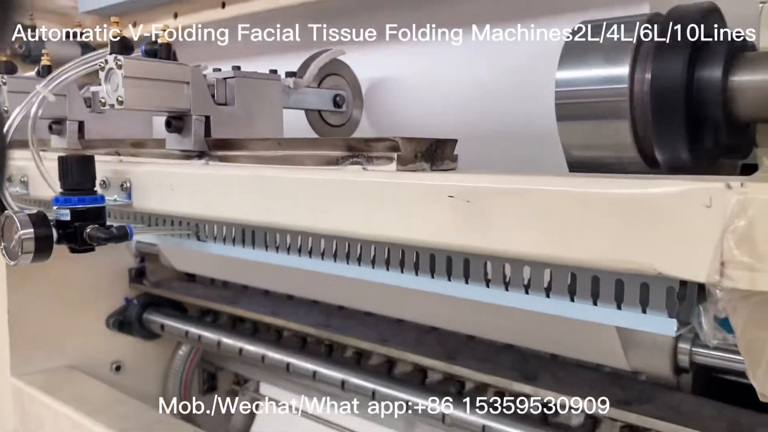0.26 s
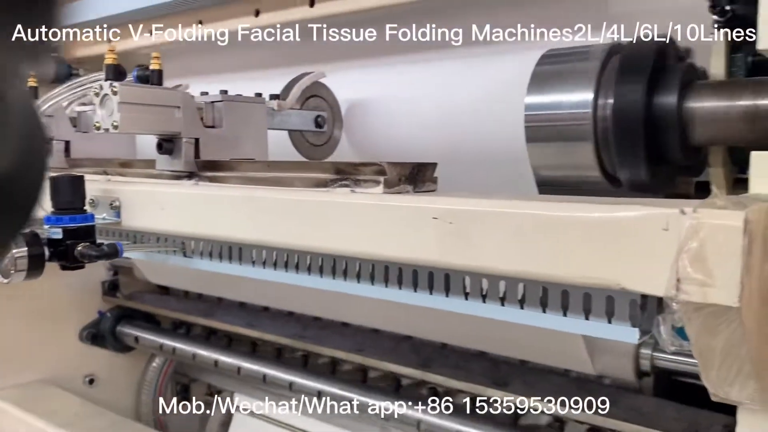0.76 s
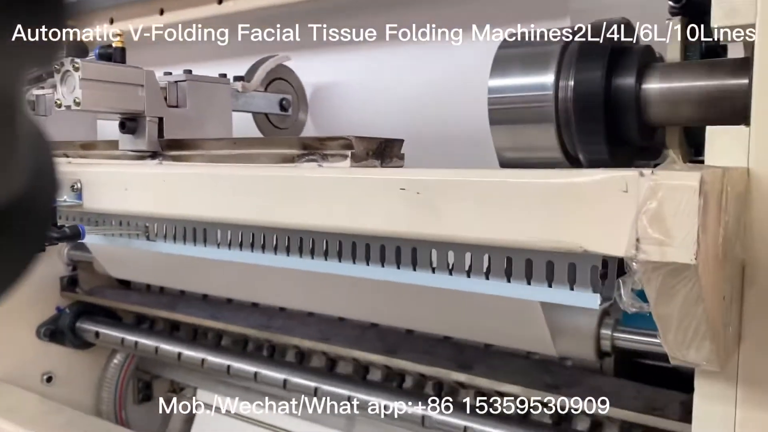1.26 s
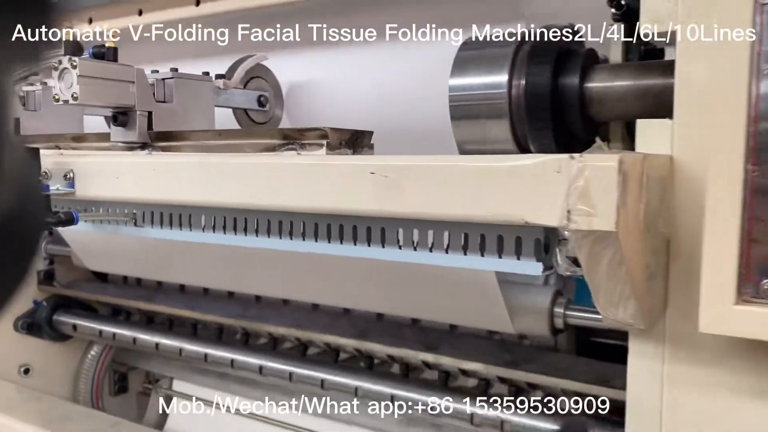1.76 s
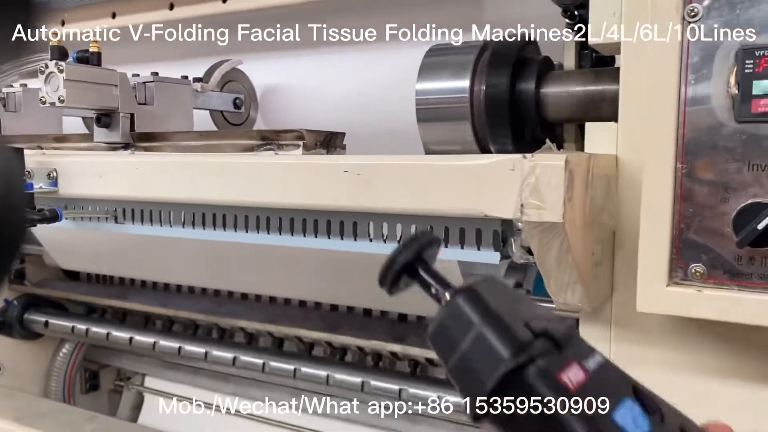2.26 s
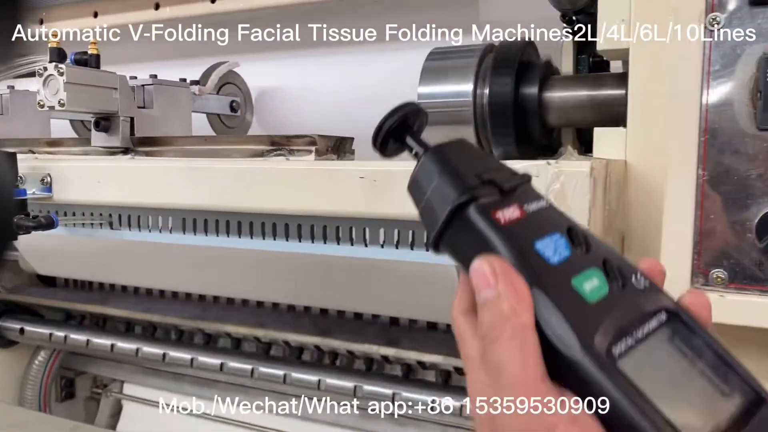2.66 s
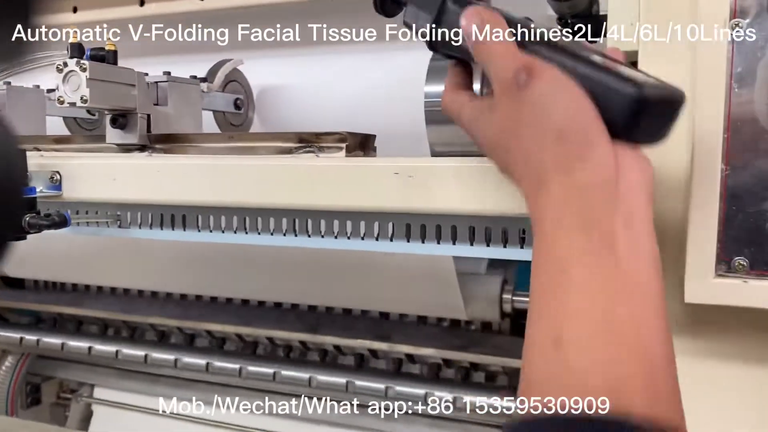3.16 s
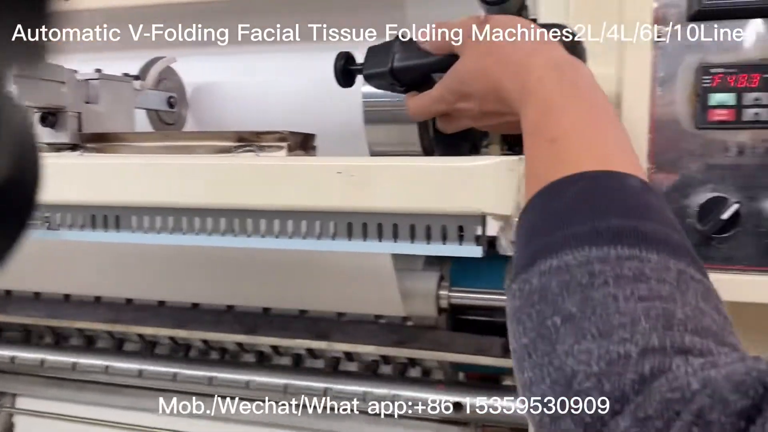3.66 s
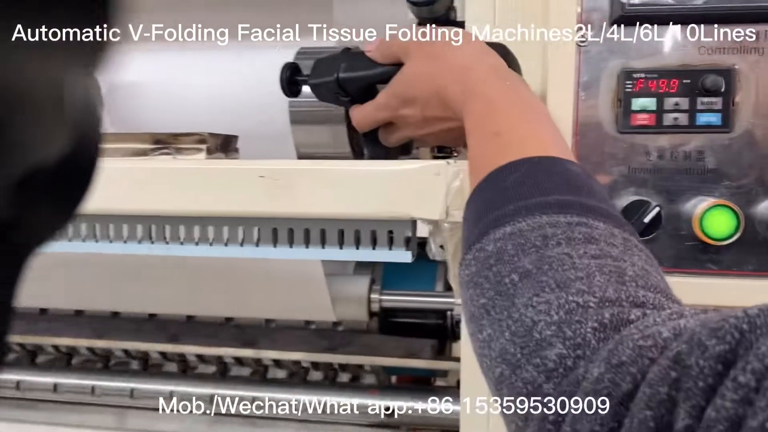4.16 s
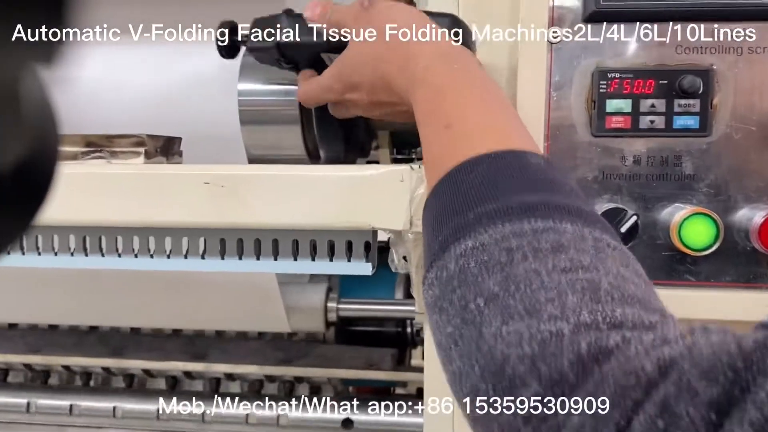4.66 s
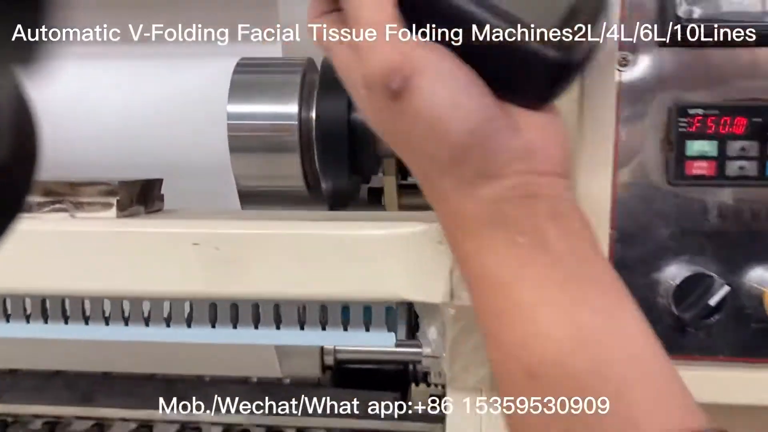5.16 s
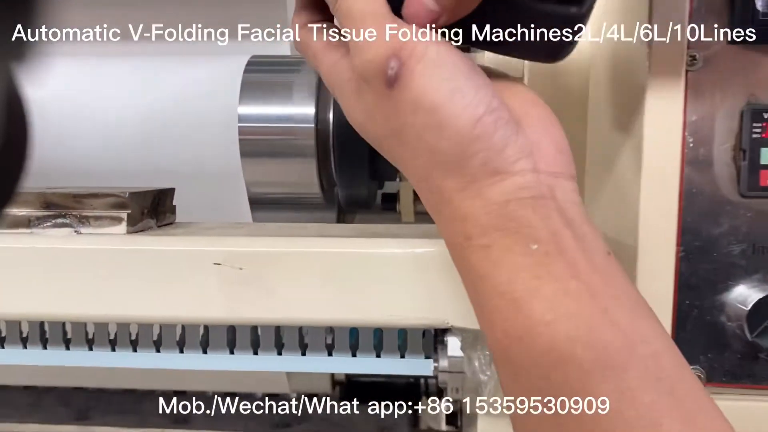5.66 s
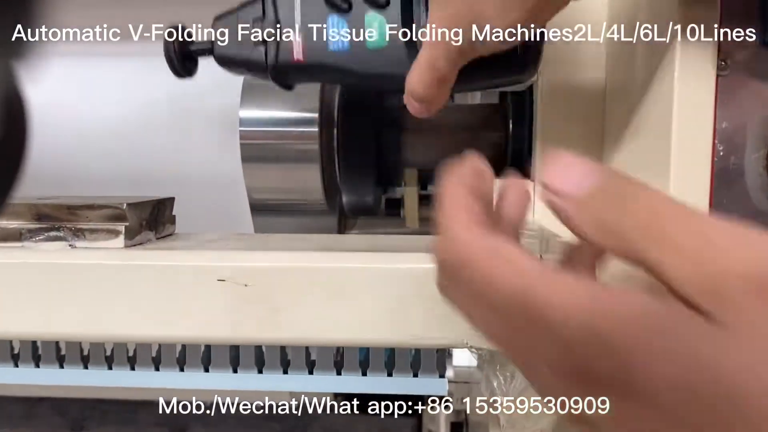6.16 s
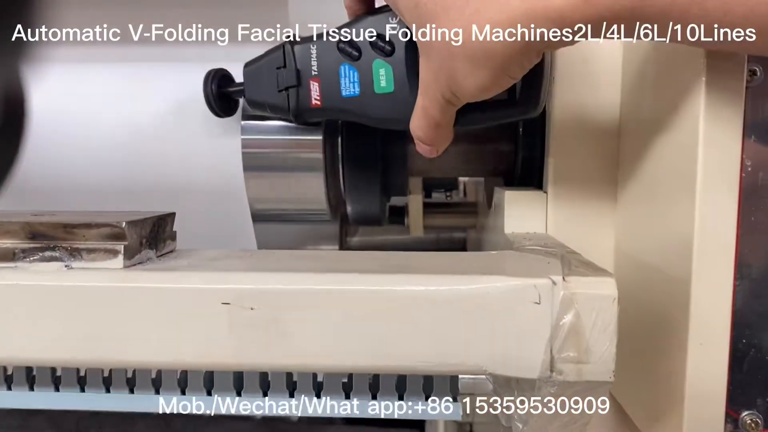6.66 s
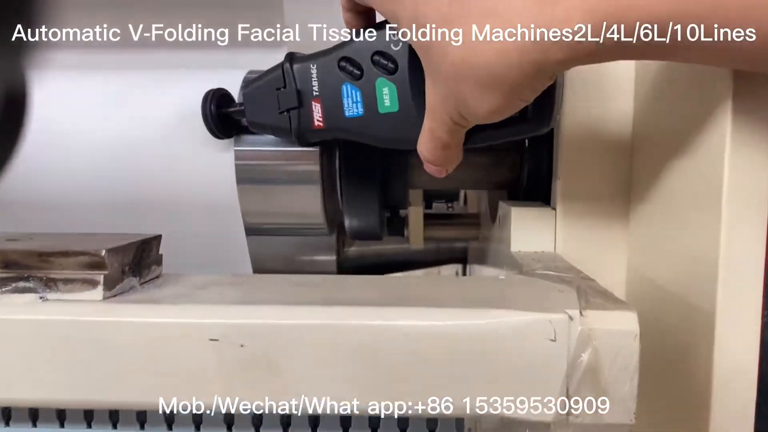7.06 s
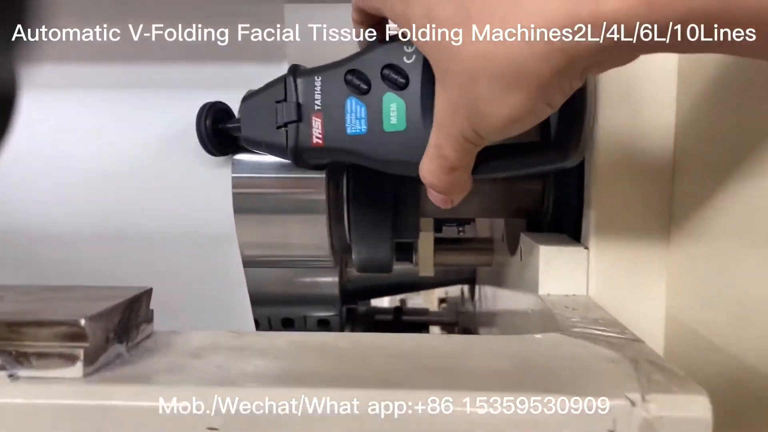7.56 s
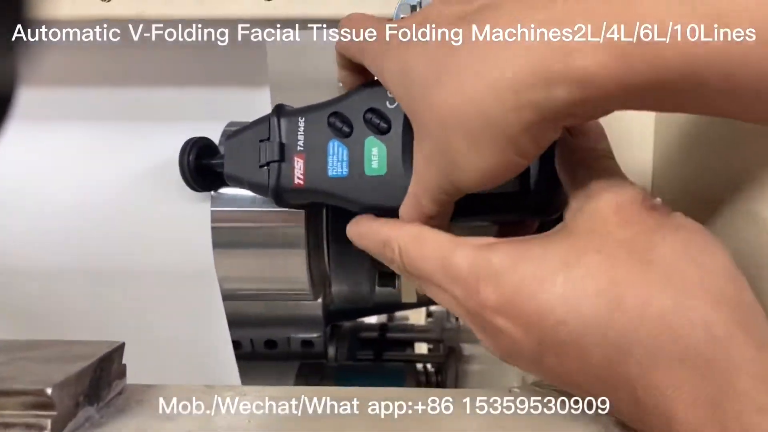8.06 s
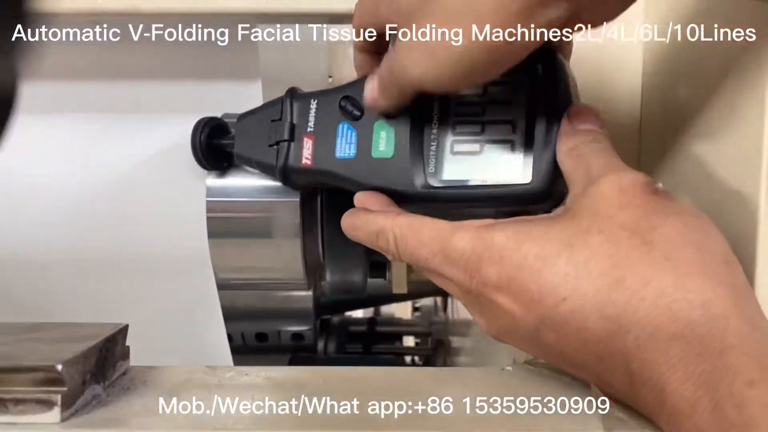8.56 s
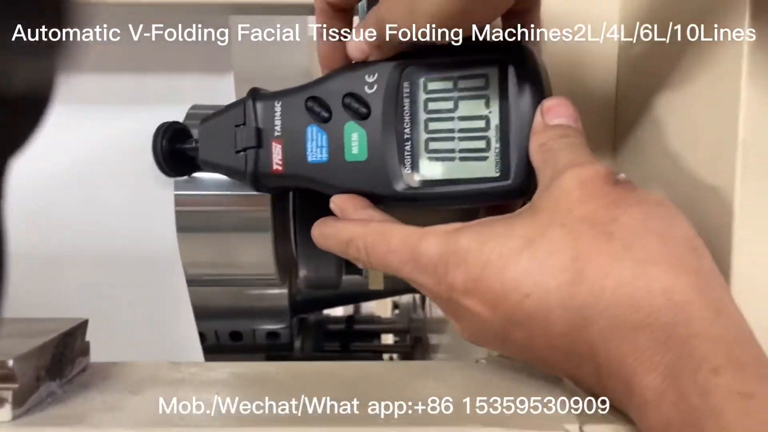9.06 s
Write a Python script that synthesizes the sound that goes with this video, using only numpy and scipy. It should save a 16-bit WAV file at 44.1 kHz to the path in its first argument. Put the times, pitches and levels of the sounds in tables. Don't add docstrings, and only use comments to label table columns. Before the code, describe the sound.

Close beside a running paper folding machine in a factory hall, knives shear in a fast metallic clatter, every third crack strongest. The pace climbs in steps during the first four seconds, then holds. Dull shaft knocks grow nearer, rolls and gears drum and hum, the motor whines, a bearing squeals briefly early on, and suction air hisses. Near stereo microphones, short hall reverberation.

```python
import sys
import numpy as np
from scipy import signal
from scipy.fft import rfft, irfft
from scipy.io import wavfile
from scipy.ndimage import uniform_filter1d

SR = 44100
rng = np.random.default_rng(int(sys.argv[2]) if len(sys.argv) > 2 else 0)


def to_wav(s):
    ch = np.atleast_2d(s).T
    pcm = np.round(np.clip(ch, -1, 1) * 32767)
    wavfile.write(sys.argv[1], SR, pcm.astype(np.int16))


def gain_from_db(level_db):
    decades = np.asarray(level_db, float) / 20
    return 10 ** decades


N = 411012
TIME = np.arange(N) / SR
HZ = np.fft.rfftfreq(N, 1 / SR)

# (time [s], cut rate [cuts/s])
SPEED = [(0, 5.9591), (.4947, 6.1425), (1.0062, 6.9311), (1.379, 7.2203), (2.2717, 7.2208),
         (3.1993, 8.4331), (3.934, 8.642), (3.974, 8.906), (9.32, 8.906)]
# (time [s], level [dB])
SHAFT_NEAR = [(0, -16), (2.5, -9.5), (4.2, -3.5), (5.4, -6), (5.9, 0.3), (8.3, 1.4), (9.32, -2.5)]


def in_time(rows):
    seconds, *columns = np.transpose(rows)
    return [np.interp(TIME, seconds, column) for column in columns]


def cut_count():
    first_cut = -.1492
    return first_cut + np.cumsum(in_time(SPEED)[0]) / SR


def follow(base_db, share, control_db):
    return gain_from_db(base_db + share * control_db)


def gate(start, length, edge_s=.08):
    inside = np.minimum(TIME - start, start + length - TIME)
    return np.clip(inside / edge_s + .5, 0, 1)


def drift(rate):
    knots = rng.standard_normal(int(N / SR * rate) + 2)
    return uniform_filter1d(np.interp(TIME * rate, np.arange(len(knots)), knots), size=400)


def slope(points):
    hz, db = np.transpose(points)
    return gain_from_db(np.interp(np.log(HZ + 1), np.log(hz), db))


def bell(hz, centre_hz, width_hz):
    return 1 / (1 + 2j * (hz - centre_hz) / width_hz)


def lift(peaks, hz):
    return gain_from_db(sum(db * np.abs(bell(hz, centre_hz, width_hz)) ** 2 for centre_hz, width_hz, db in peaks))


def modes(peaks):
    gain = 0
    for k, (centre_hz, width_hz, db) in enumerate(peaks):
        gain = gain + gain_from_db(db) * bell(HZ, centre_hz, width_hz) * (-1) ** k
    return gain / np.sqrt(np.mean(np.abs(gain) ** 2))


def colour(x, gain):
    return irfft(rfft(x) * gain, N)


def noise(gain):
    return colour(rng.standard_normal((2, N)), gain / np.sqrt(np.mean(gain ** 2)))


def tone(cycles, db):
    quarter_apart = np.c_[[0, 1 / 4]]
    return gain_from_db(db) * np.sqrt(2) * np.sin(2 * np.pi * (cycles + rng.random() + quarter_apart))


def knives(cuts, near_db, grains_per_s=7000, size_db=3.0, uneven_db=.9):
    # (place [cuts], rise [cuts], fall [cuts],
    # crack [dB], low ring [dB], high ring [dB])
    contacts = [(.93, 0.013, 0.029, -22, -60, -23.5), (0.992, 0.025, 0.022, -18.5, -21.5, -20.5),
                (1.027, 0.013, 0.022, -21.5, -21, -40), (1.41, .005, 0.074, -29.5, -44, -31),
                (1.543, 0.019, .03, -32, -36, -36), (1.92, 0.018, 0.045, -30.5, -43, -28.5),
                (1.978, 0.036, 0.025, -21.5, -22, -35.5), (2.025, 0.021, 0.027, -25, -31, -25.5),
                (2.41, .005, 0.066, -31, -34, -33.5), (2.54, 0.0094, 0.052, -33.5, -41, -30),
                (2.915, 0.032, 0.031, -37, -38.5, -28.5), (2.962, 0.012, 0.03, -24, -22.5, -38),
                (3.019, 0.03, 0.026, -22, -30, -28), (3.404, 0.0092, 0.11, -31.5, -40.5, -31.5),
                (3.54, 0.026, 0.027, -41, -37, -37.5)]
    # (frequency [Hz], density [dB per Hz])
    crack_colour = [(900, -53), (1800, 4), (2600, 0), (4000, -6), (5600, -1), (6500, 1.5), (8000, -2),
                    (9500, -4), (12000, -7.5), (15500, -5), (16500, -5)]
    # (frequency [Hz], width [Hz], level [dB])
    knife_ring = [(3466, 560, -1.5), (3585, 160, 6), (3935, 47, -5)]
    # (frequency [Hz], width [Hz], level [dB])
    anvil_ring = [(4180, 236, -3), (4710, 190, 0.5), (5110, 450, -7.5), (7310, 220, -2.5)]

    sizes = gain_from_db(size_db * np.minimum(rng.exponential(1, (2, N)), 5)) * rng.choice([-1, 1], (2, N))
    grains = sizes * (rng.random((2, N)) < grains_per_s / SR)
    grains *= follow(0.58, 1.83, near_db) / np.sqrt(np.mean(grains ** 2))

    press = np.zeros((3, N))
    for place, rise, fall, *level_db in contacts:
        turn, since = np.divmod(cuts - place + 1.5, 3)
        since -= 1.5
        shape = np.exp(np.where(since < 0, since / rise, -since / fall))
        passes = gain_from_db(np.c_[level_db] + uneven_db * rng.standard_normal((3, 30)))
        press += shape * passes[:, turn.astype(int) + 2]

    crack = slope(crack_colour)
    bodies = [crack / np.sqrt(np.mean(crack ** 2)), modes(knife_ring), modes(anvil_ring)]
    return sum(colour(grains * p, body) for p, body in zip(press, bodies))


def knocks(cuts, uneven_db=1.3):
    # (frequency [Hz], level [dB], T60 [s], lag [s])
    cover_modes = [(227, -12.5, 0.083, .03), (293, -23.5, 0.049, .022), (376, -18.5, 0.09, .018),
                   (438, -11, 0.076, 0.00313), (540, -22, 0.043, 0.0059), (666, -20, 0.099, 0.00212),
                   (708, -23, 0.053, 0.00503), (812.7, -17, 0.11, 0.00289), (872, -23, 0.032, 0.00084),
                   (966, -19.5, 0.041, 0.00595), (1095, -23, 0.052, 0.00293), (1225, -23.5, 0.066, 0.0077)]
    first, every = .7, 1.8912
    rebound, rebound_db, rebound_hz = .53, -3.5, 800
    contact_hz = 100

    turns = np.arange(int((cuts[-1] - first) / every) + 1)
    out = np.zeros((2, N))
    for hz, db, t60, lag in cover_modes:
        hits = np.full((2, N + SR), 1e-18)
        dulled_db = rebound_db - 10 * np.log10(1 + (hz / rebound_hz) ** 4)
        for share, loss_db in ((0, 0), (rebound, dulled_db)):
            at = np.searchsorted(cuts, first + every * (turns + share)) + int(lag * SR)
            strength_db = db + loss_db + uneven_db * rng.standard_normal((2, len(turns)))
            hits[:, at] = gain_from_db(strength_db) * rng.choice([-1, 1])
        r = gain_from_db(-60 / (t60 * SR))
        w = 2 * np.pi * hz / SR
        ringing = signal.lfilter([0, np.sin(w)], [1, -2 * r * np.cos(w), r * r], hits[:, :N])
        out += signal.lfilter(*signal.iirpeak(hz, hz / contact_hz, fs=SR), ringing)
    return out * gain_from_db(in_time(SHAFT_NEAR)[0])


def rolls(cuts):
    # (multiple of the cut rate, level [dB])
    gears = [(22, -36), (26.42, -36.5), (25.92, -39), (38.58, -39), (38.08, -45), (39.08, -46), (74.8, -42),
             (149.6, -55.5)]
    # (multiple of the cut rate, level [dB])
    drive_gears = [(18, -42.5), (19, -38), (20, -31.5)]
    # (time [s], level [dB])
    drive_load = [(0, -17), (.4, 4.5), (.9, -4), (1.2, 6.5), (1.8, 7.5), (2.1, -8), (2.4, 7.5), (3, -7),
                  (3.6, -6), (5, 2.5), (9.32, 1)]
    # (frequency [Hz], width [Hz], lift [dB])
    panels = [(128, 25, 4), (235, 22, 8), (285, 20, 6), (345, 20, 10), (542, 30, 12), (1080, 50, 13)]

    per_s, = in_time(SPEED)
    out = np.zeros((2, N))
    for times, db in gears:
        mesh = tone(times * cuts + 0.087 * drift(7), db + 2.2 * drift(9))
        out += mesh * lift(panels, times * per_s)
    load = gain_from_db(in_time(drive_load)[0])
    for times, db in drive_gears:
        mesh = tone(times * cuts, db + 2.2 * drift(3.5))
        out += load * mesh * lift(panels, times * per_s)
    for times in range(9, 34):
        out += tone(times * cuts, -43 + 2.0 * rng.standard_normal())
    return out


def whines(near_db, facing_db):
    # (multiple, level [dB], share of the facing)
    drive_tones = [(1, -49.5, .1), (4, -56, .2), (6, -47, .4)]
    # (start [s], length [s], frequency [Hz], glide [Hz/s], level [dB])
    squeals = [
        (.03, .24, 2392, 0, -41),
        (.33, .32, 2388, -40, -41.5),
        (1.8, .42, 2336, 0, -44.5),
        (2.3, .14, 2336, 0, -48),
    ]
    # (frequency [Hz], level [dB])
    steady_tones = [(1382, -44), (5125, -58)]

    out = np.zeros((2, N))
    cycles = 2563.6 * TIME + 0.1 * drift(8.4)
    open_db = 8 * gate(1.03, 1.52)
    for times, db, share in drive_tones:
        clear_db = open_db * (times == 1)
        out += tone(times * cycles, db + share * facing_db + clear_db + 1.6 * drift(15))
    for start, length, hz, glide, db in squeals:
        t = TIME - start
        squeal_cycles = hz * t + glide * t ** 2 / 2 + .2 * drift(12)
        out += gate(start, length) * tone(squeal_cycles, db + 1.5 * drift(14))
    for hz, db in steady_tones:
        out += tone(hz * TIME + 0.08 * drift(6), db + 0.99 * near_db + 2.0 * drift(3))
    return out


def running(near_db, facing_db):
    # (frequency [Hz], density [dB per Hz])
    rumble = [(40, -6), (50, -3.5), (72, -12), (86, -3), (105, -0.5), (124, 0), (200, -5), (315, -3),
              (442, -5.5), (540, -7), (1160, -17), (1620, -17), (2090, -25), (3200, -27)]
    # (frequency [Hz], width [Hz], lift [dB])
    frame_modes = [(67.6, 12, 11.5), (101, 49, 4.5), (128.4, 20, 3.5), (177, 20, 2.5), (218, 14.5, 7),
                   (288.5, 7.4, 5), (356, 12, 4), (449, 4.3, 0), (558, 11, 4), (755, 8.1, 3.5),
                   (1420, 60, 1), (1662, 12, 8.5)]
    # (frequency [Hz], density [dB per Hz])
    air_colour = [(2400, 7), (3000, 1), (4000, -2.5), (5500, -3), (7000, -5.5), (8300, -8), (9500, -7.5),
                  (12000, -8.5), (13500, -19), (15000, -6), (15700, -1.5), (16500, -19)]
    # (frequency [Hz], width [Hz], level [dB])
    leak_tone = [(5200, 1600, -0.5), (10900, 1700, -8.5), (15800, 660, 6.5)]

    frame = slope(rumble) * lift(frame_modes, HZ)
    below_deep = 1 / (1 + (HZ / 180) ** 8)
    below_drum = 1 / (1 + (HZ / 900) ** 8)
    below_rustle = 1 / (1 + (HZ / 3000) ** 8)
    above_rustle = 1 / (1 + (2600 / (HZ + 1)) ** 8)
    deep_gain = frame * np.sqrt(below_deep)
    drum_gain = frame * np.sqrt((1 - below_deep) * below_drum)
    rustle_gain = frame * np.sqrt((1 - below_drum) * below_rustle)
    air_gain = slope(air_colour) * np.sqrt(above_rustle)

    deep = follow(-24.5, 1.1, near_db) * gain_from_db(0.2 * drift(12)) * noise(deep_gain)
    drum = follow(-17.5, 0.88, near_db) * gain_from_db(1.8 * drift(14)) * noise(drum_gain)
    rustle = follow(-26.5, 2, near_db) * gain_from_db(1.26 * drift(20)) * noise(rustle_gain)
    air = follow(-37, .1, near_db) * gain_from_db(2.0 * drift(25)) * noise(air_gain)
    leak = follow(-31, 1, facing_db) * gain_from_db(0.46 * drift(10.8)) * noise(np.abs(modes(leak_tone)))
    return deep + drum + rustle + air + leak


def thin_hiss():
    hiss_gain = np.abs(modes([(9400, 1600, 0)])) ** 2
    return follow(-56, 1.1, in_time(SHAFT_NEAR)[0]) * gain_from_db(2.6 * drift(35)) * noise(hiss_gain)[0]


def hall(x, t60_s=.35, level_db=-13):
    t = TIME[:SR // 2]
    tail = rng.standard_normal((2, len(t))) * gain_from_db(-60 * t / t60_s) * (t > .002)
    tail /= np.sqrt(np.sum(tail ** 2) / 2)
    return gain_from_db(level_db) * signal.fftconvolve(x, tail, axes=1)[:, :N]


def ports(pair):
    # (frequency [Hz], likeness [0-1], right leads [rad], left minus right [dB])
    port_pair = [(0, .995, 0, 1), (130, .95, 0, 1.4), (300, .75, .05, 1.1), (700, .15, .3, .4),
                 (1150, .2, -1.2, .3), (1700, .78, -.2, -1), (2700, .6, 1, -1.6), (3800, .68, .6, -3),
                 (5700, .12, 1.2, -3), (6500, .65, .5, -.5), (8000, .45, -1.7, 1.5), (8800, .9, -2.8, 1.5),
                 (9600, .85, -3.95, .2), (17000, .9, -14.4, 0)]
    port_hz, *columns = np.transpose(port_pair)
    alike, lead, balance_db = (np.interp(HZ, port_hz, column) for column in columns)
    shared, own = rfft(pair)
    right = (alike * shared + np.sqrt(1 - alike ** 2) * own) * np.exp(1j * lead)
    return irfft(np.array([shared * gain_from_db(balance_db / 2), right * gain_from_db(-balance_db / 2)]), N)


def scene():
    # (time [s], level [dB])
    closeness = [(0, -2), (1, -2), (2.5, -2), (3.3, -1), (4.3, -0.24), (5.5, 0.4), (6.4, 0.35), (7.8, -0.1),
                 (9.32, -0.2)]
    # (time [s], level [dB])
    facing = [(0, -6.5), (.8, -5), (1.5, -2), (2.2, -0.3), (2.7, 0), (3.3, -13), (4.2, -16), (5.8, -27),
              (6.6, -6), (7.3, -11), (9.32, -19)]
    cuts = cut_count()
    near_db, = in_time(closeness)
    facing_db, = in_time(facing)
    blows = knives(cuts, near_db) + knocks(cuts)
    machine = rolls(cuts) + whines(near_db, facing_db) + running(near_db, facing_db)
    return ports(blows + hall(blows) + machine) + thin_hiss()


def roll_off(x):
    return signal.sosfilt(signal.butter(12, 17130, fs=SR, output="sos"), x)


def record(dry):
    top = signal.cheby2(14, 60, 16080, fs=SR, output="sos")
    bottom = signal.butter(6, 44, "high", fs=SR, output="sos")
    rounded = .92 * np.tanh(dry / .92)
    return roll_off(signal.sosfilt(np.r_[bottom, top], rounded))


dry = scene()
out = record(dry)
to_wav(out)
```